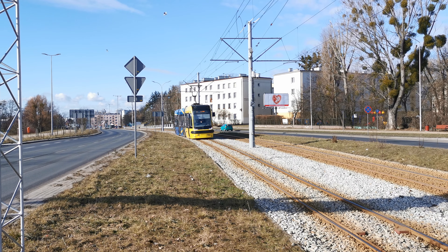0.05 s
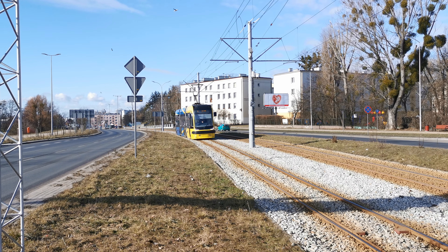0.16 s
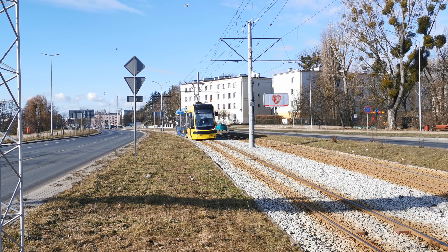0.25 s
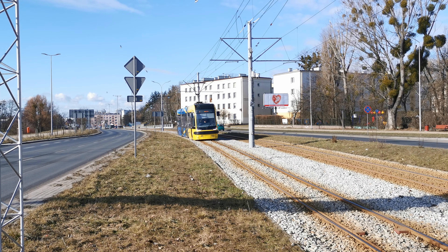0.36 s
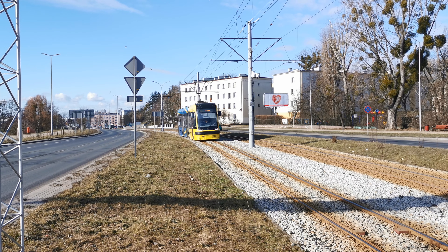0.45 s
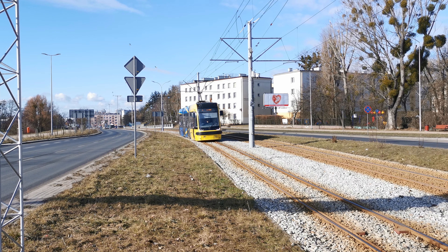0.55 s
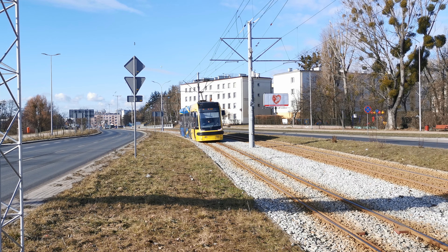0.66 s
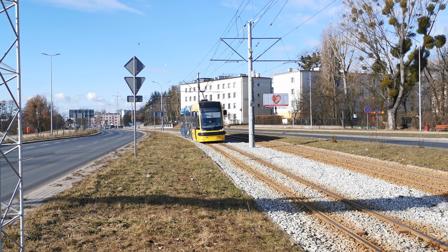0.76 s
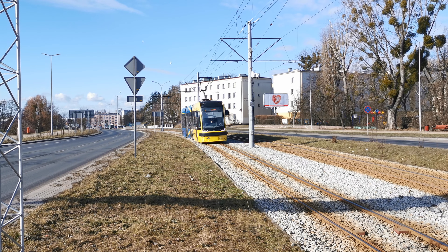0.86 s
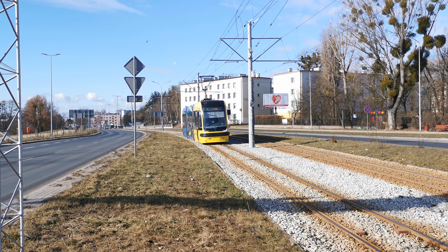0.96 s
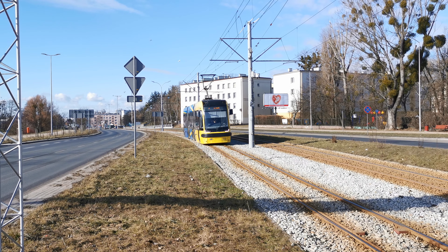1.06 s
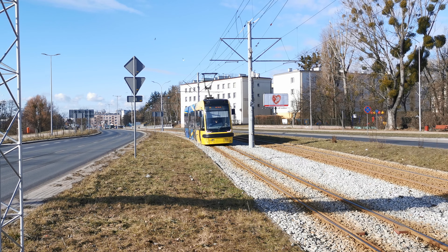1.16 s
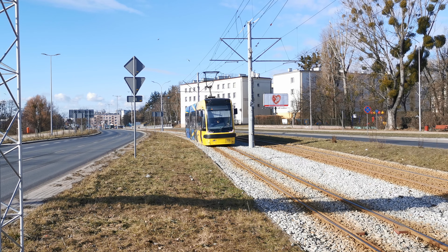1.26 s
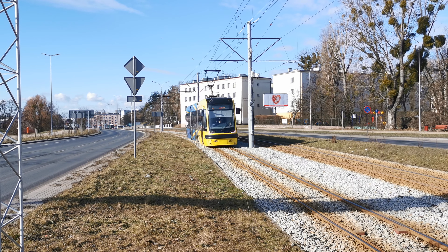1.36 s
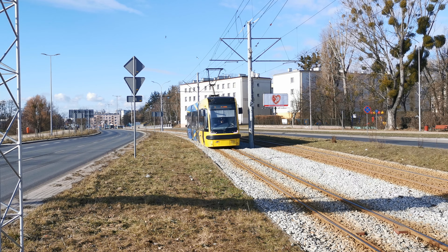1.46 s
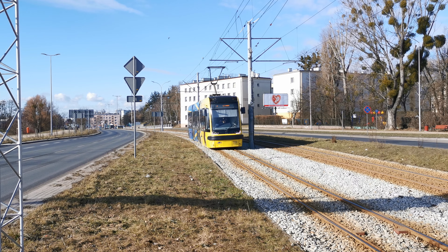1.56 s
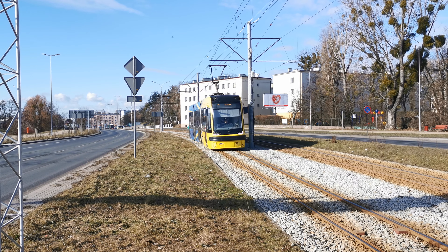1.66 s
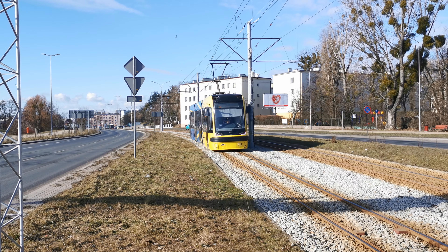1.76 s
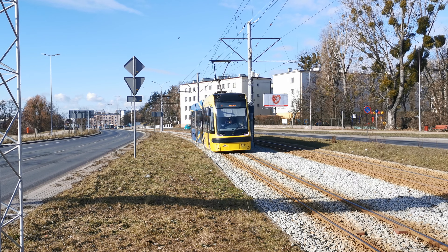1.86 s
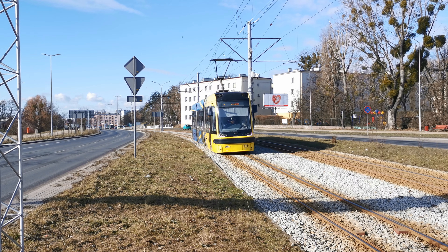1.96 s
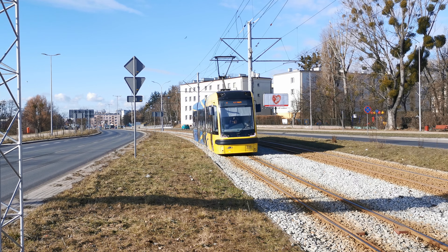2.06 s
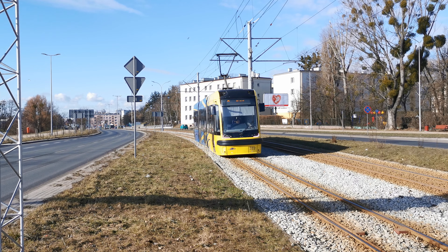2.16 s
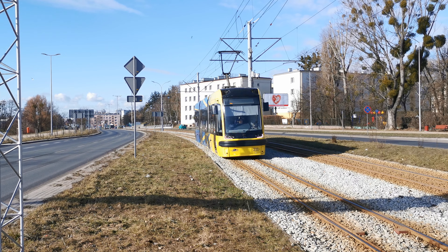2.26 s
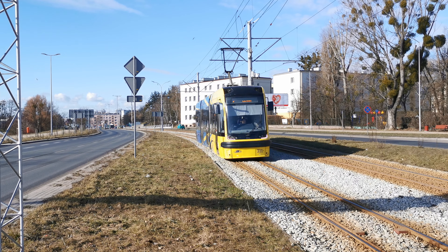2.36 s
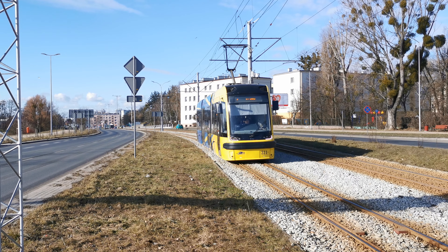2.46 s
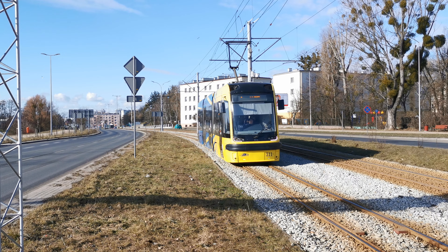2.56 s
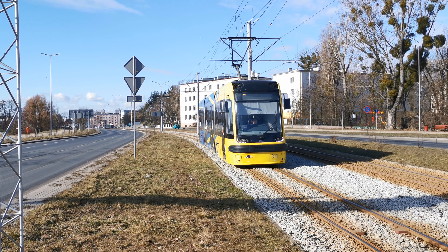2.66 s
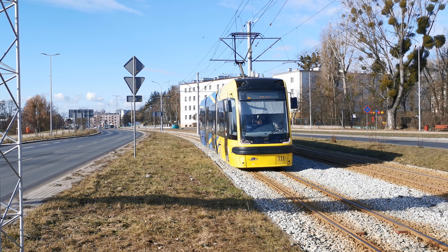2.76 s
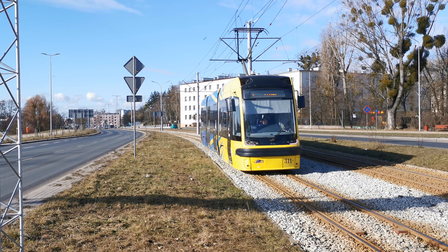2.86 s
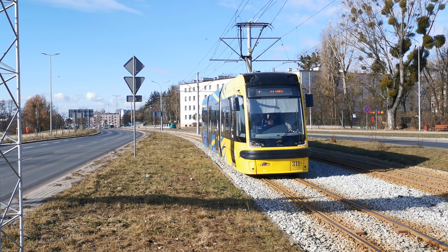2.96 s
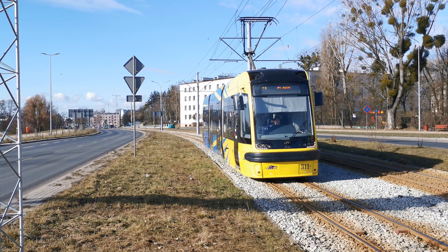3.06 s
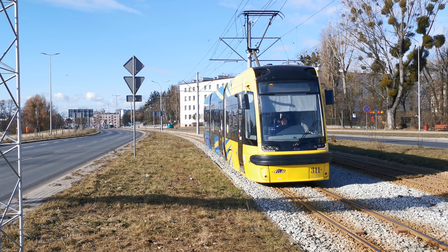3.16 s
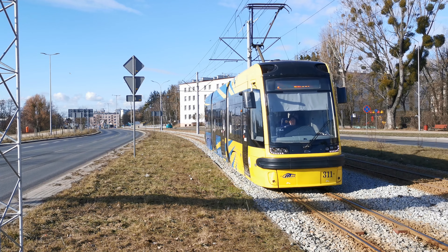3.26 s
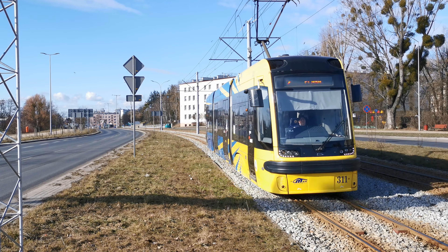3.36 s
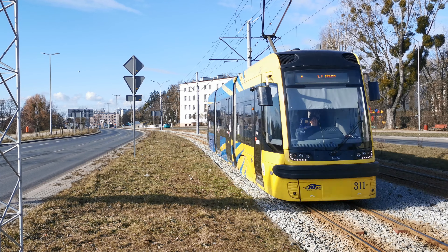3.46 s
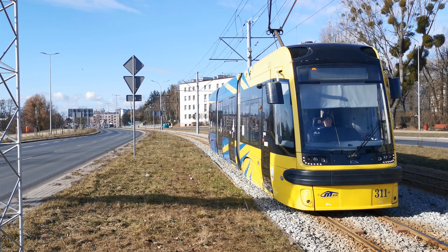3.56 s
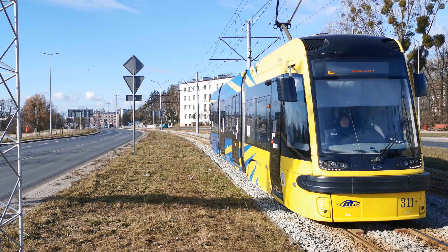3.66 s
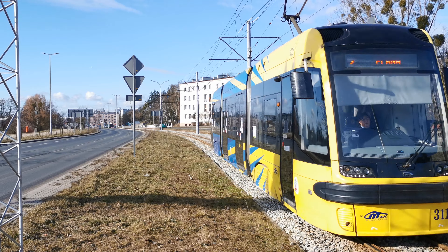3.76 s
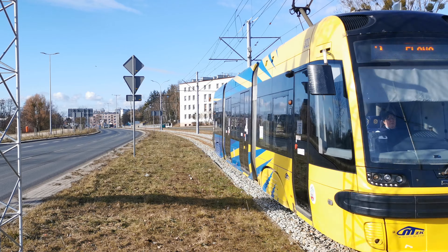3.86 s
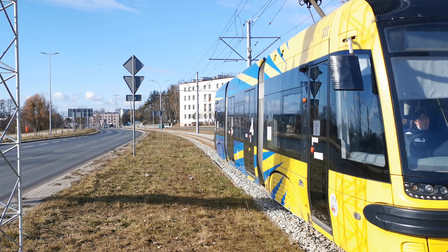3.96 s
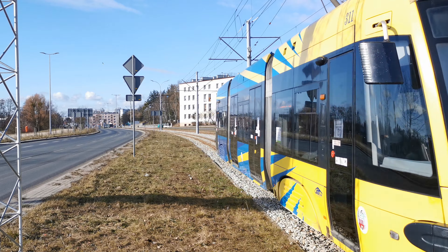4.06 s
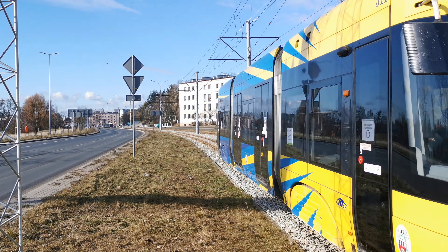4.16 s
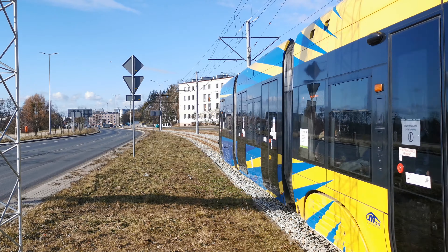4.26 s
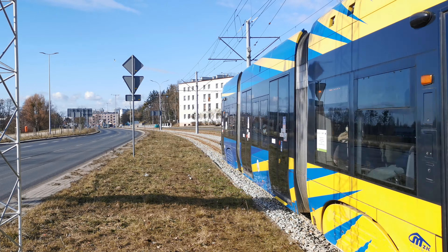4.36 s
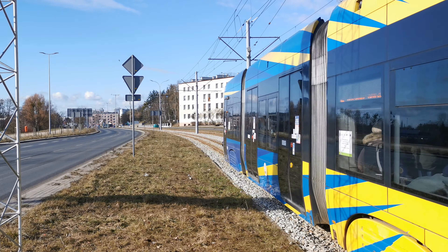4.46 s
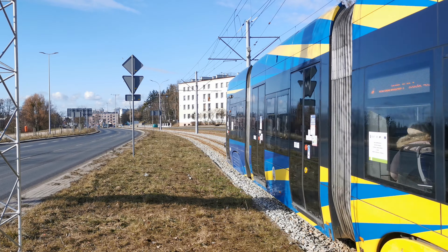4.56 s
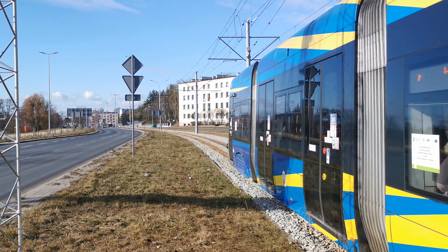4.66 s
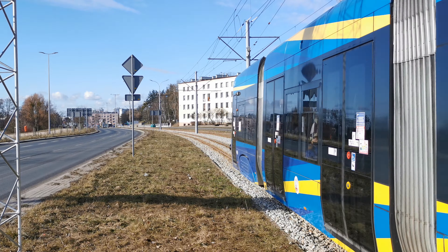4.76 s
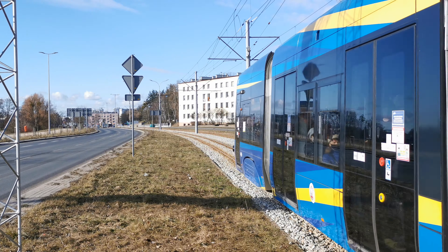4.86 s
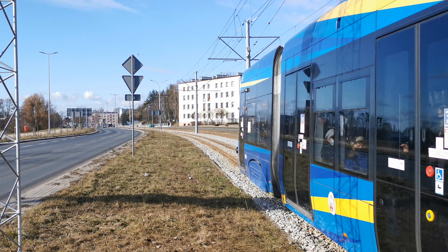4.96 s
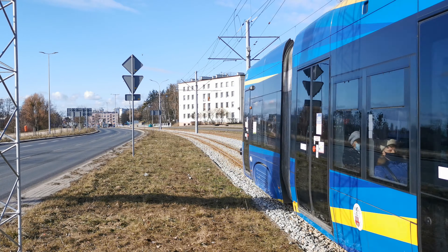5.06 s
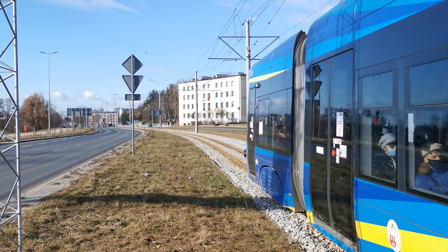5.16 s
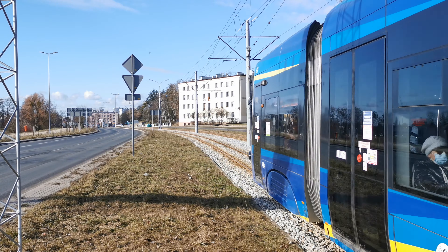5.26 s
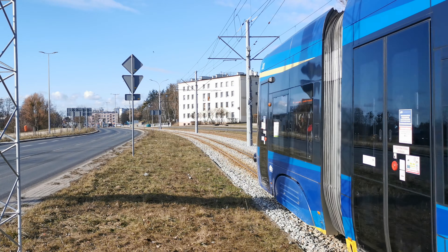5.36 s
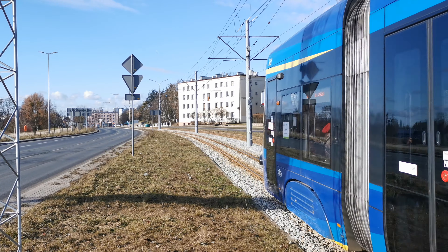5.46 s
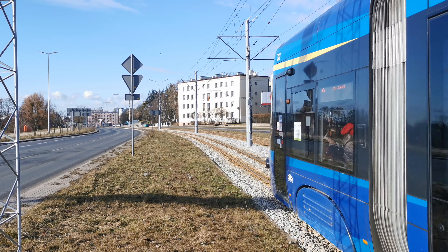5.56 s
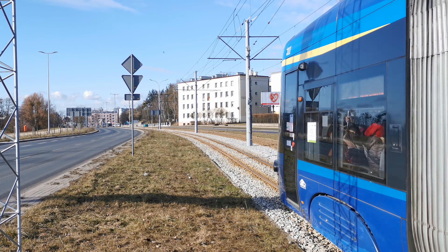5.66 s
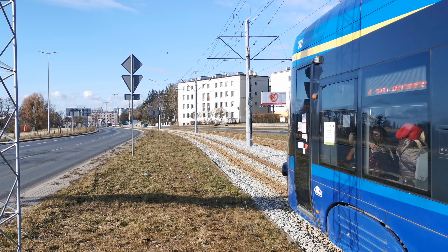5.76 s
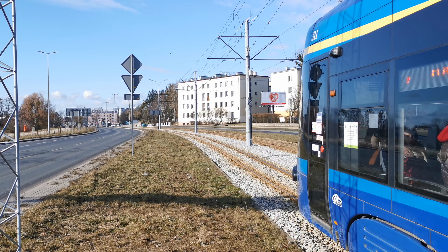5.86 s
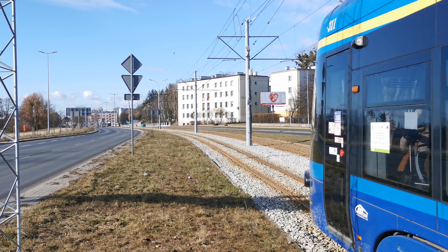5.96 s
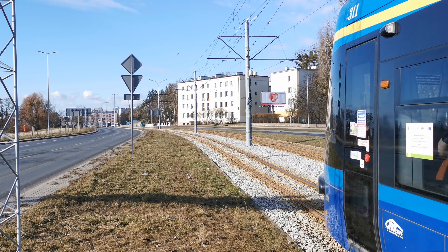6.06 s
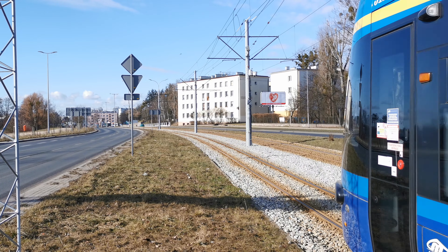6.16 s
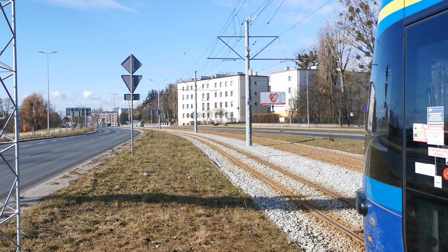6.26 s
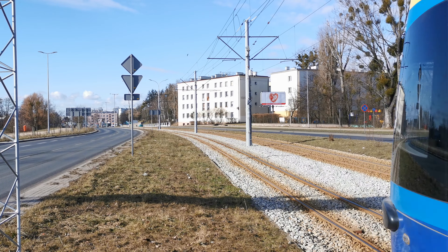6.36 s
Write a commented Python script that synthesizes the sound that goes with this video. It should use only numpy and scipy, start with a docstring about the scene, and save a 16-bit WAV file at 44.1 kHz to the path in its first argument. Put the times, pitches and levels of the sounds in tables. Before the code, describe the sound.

An electric tram approaches and passes close by, its wheels roaring and thumping on the rails over a slowly falling hum.

```python
"""A grass verge beside ballasted tram track, a stereo microphone a few metres from the rails.
Far traffic drones behind a thin, fitful rustle; then a low-floor tram slows past, close by.
Its wheels roar on rough rail and ring, the gear hum sinks with the speed, and the roof converter's
whine drops as it goes by. The running gear thumps, the panels boom and the ground shakes."""
import sys
import numpy as np
from scipy import signal
from scipy.fft import rfft, irfft, next_fast_len
from scipy.io import wavfile
from scipy.ndimage import uniform_filter1d, map_coordinates

SR = 44100
rng = np.random.default_rng(int(sys.argv[2]) if len(sys.argv) > 2 else 0)


def transcribe(signal):
    """Save signal, clipped to [-1, 1], as a 16-bit WAV file at the path in sys.argv[1]."""
    frames = np.atleast_2d(signal).T
    limited = np.clip(frames, -1, 1)
    pcm = np.round(limited * 32767).astype(np.int16)
    wavfile.write(sys.argv[1], SR, pcm)


N = 283284
TIME = np.arange(N) / SR
NOSE_S = 4.127  # the tram's nose is abreast of the microphone
FRONT_M, REAR_M = 4.56, 15.18  # the bogies, behind the nose


def amp(db):
    """Decibels to gain."""
    return 10 ** (np.asarray(db) / 20)


def unit(x):
    """Scale to rms 1."""
    return x / np.sqrt(np.mean(x ** 2) + 1e-20)


def along(points, hz):
    """(Hz, value) points read on a log axis."""
    freqs, values = np.transpose(points)
    return np.interp(np.log(hz + 1), np.log(freqs + 1), values)


def curve(points):
    """(seconds, value) points read at every sample."""
    return np.interp(TIME, *np.transpose(points))


def wobble(rate):
    """A smooth random curve, rate knots a second."""
    return map_coordinates(rng.standard_normal(int(N * rate / SR) + 4), [TIME * rate])


def swells(rows, skew=1):
    """Sum of smooth humps (centre s, length s, height); with skew above 1 they rise faster than fall."""
    hump = lambda u: np.exp(-np.abs(u * np.where(u < 0, skew, 1 / skew)) ** 2.7)
    return sum(height * hump(2 * (TIME - s) / length) for s, length, height in rows)


def filtered(x, response):
    """x through a frequency response."""
    size = next_fast_len(N + 8192)
    return irfft(rfft(x, size) * response(np.fft.rfftfreq(size, 1 / SR)), size)[..., :N]


def colour(x, spectrum):
    """x through a spectrum that falls away steeply beyond its ends, at rms 1."""
    low, high = spectrum[0][0], spectrum[-1][0]
    band = lambda hz: (1 - 1 / (1 + (hz / low) ** 8)) / (1 + (hz / high) ** 8)
    return unit(filtered(x, lambda hz: amp(along(spectrum, hz)) * band(hz)))


def noise(patchy_db):
    """Three unrelated noises sharing patches of gain: now one band stands out, now another."""
    spectra = signal.stft(rng.standard_normal((3, N)), nperseg=1024)[2]
    patches = uniform_filter1d(rng.standard_normal(spectra.shape[1:]), size=5, axis=0)
    patches = unit(uniform_filter1d(patches, size=7, axis=1))
    return unit(signal.istft(spectra * amp(patchy_db * patches), nperseg=1024)[1][:, :N])


def grit(per_s, life_s, size):
    """Excitation gain: small specks each give a brief jolt."""
    jolts = (rng.random(N) < per_s / SR) * rng.uniform(0.25, 1, N)
    return 1 + size * signal.lfilter([1], [1, -np.exp(-1 / (life_s * SR))], jolts)


# The gear mesh as the tram brakes. Each row: time in seconds, pitch in Hz.
MESH_PITCH = [(0, 347.5), (0.85, 345.6), (2.4, 322), (3.8, 295.1), (4.85, 266.5), (5.65, 241.5),
              (6.42, 222.4)]
def mesh_hz():
    """Gear teeth meeting per second."""
    return curve(MESH_PITCH)


def speed(m_per_tooth=0.029):
    """The tram's speed in m/s."""
    return m_per_tooth * mesh_hz()


def past(behind_m):
    """Metres by which a point so far behind the nose has passed the microphone."""
    travel = np.cumsum(speed()) / SR
    return travel - np.interp(NOSE_S, TIME, travel) - behind_m


def nearness(behind_m, reach_m):
    """Closest distance over present distance of a point on the tram: 1 when abreast."""
    return reach_m / np.hypot(past(behind_m), reach_m)


def bogies(front_db, rear_db, lag_m, reach_m, fall=1):
    """Gain of a sound that both bogies make, loudest lag_m after each goes by."""
    return np.hypot(amp(front_db) * nearness(FRONT_M + lag_m, reach_m) ** fall,
                    amp(rear_db) * nearness(REAR_M + lag_m, reach_m) ** fall)


def unveiled(at_m, over_m):
    """The nose screens a source until the tram's side comes into view: 0 to 1."""
    return 0.5 + 0.5 * np.tanh(past(at_m) / over_m)


def ahead(db, fall):
    """Gain of what the track carries ahead of the tram; it fades slowly with distance."""
    return amp(db) * nearness(FRONT_M, reach_m=6.65) ** fall


# Scattered sound at the microphone's two ports. Each row: frequency in Hz, likeness from 0 to 1.
PORT_LIKENESS = [(30, 0.95), (150, 0.98), (300, 0.95), (550, 0.76), (900, 0.66), (1500, 0.25), (15000, 0)]
def scattered(pair):
    """Sound from all around: alike at both ports in the bass, unrelated in the treble."""
    angle = lambda hz: np.arccos(np.clip(along(PORT_LIKENESS, hz), -1, 1)) / 2
    mid, side = filtered(pair, lambda hz: np.array([np.cos(angle(hz)), np.sin(angle(hz))]))
    return np.array([mid + side, mid - side])


def diffuse(spectrum, patchy_db):
    """Coloured noise with no direction."""
    return colour(scattered(noise(patchy_db)[1:]), spectrum)


def aimed(x, port_lag_ms=0.25):
    """Sound from the tram's direction reaches one port first; the order turns as the front goes by."""
    bearing = past(behind_m=1.93) / np.hypot(past(behind_m=3), 3)
    half_lag = port_lag_ms * bearing * SR / 2000
    return np.array([map_coordinates(x, [np.arange(N) + way * half_lag], mode="nearest")
                     for way in (-1, 1)])


def radiated(spectrum, patchy_db, drive=1, direct=1):
    """Noise from the tram's direction: a straight path plus scatter from the surroundings."""
    share = 0.44 * direct  # of the power, on the straight path
    source = noise(patchy_db) * drive
    pair = np.sqrt(share) * aimed(source[0]) + np.sqrt(1 - share) * scattered(source[1:])
    return colour(pair, spectrum)


def bursts(rows, spectrum, t60, attack_s=0.001):
    """Short contacts, each a quickly dying puff of noise."""
    attack = lambda s: np.clip((TIME - s) / attack_s, 0, 1)
    level = sum(attack(s) * amp(db - 60 * np.abs(TIME - s) / t60) for s, db in rows)
    return level * radiated(spectrum, patchy_db=1)


def ring(modes, loudest_s, swell_s):
    """Narrow resonances, rubbed into ringing, that swell and fade."""
    ringing = np.zeros(N)
    for hz, width, db in modes:
        waver = wobble(width) + 1j * wobble(width)
        ringing += amp(db) * unit((waver * np.exp(2j * np.pi * hz * TIME)).real)
    return aimed(ringing * np.exp(-((TIME - loudest_s) / swell_s) ** 2))


# The far drone's colour. Each row: frequency in Hz, relative level in dB.
DRONE_SPECTRUM = [(15, -38), (25, -7.5), (38, -1.5), (54, 5.5), (86, -2.5), (102, -15.5), (125, -12),
                  (160, -46), (280, -120)]
# Its swells and dips. Each row: centre in seconds, length in seconds, change in dB.
DRONE_SWELLS = [(.14, 0.27, -8), (1.07, 0.074, 5.5), (1.4, 0.086, 8), (2.22, 0.24, 2), (2.68, 0.11, 8.5),
                (2.85, .2, -7), (3.7, 0.51, 2)]
def distant_drone():
    """A deep drone from far off that wavers, swells and dips."""
    level_db = -45.5 + swells(DRONE_SWELLS) + 1.2 * wobble(5.82)
    return amp(level_db) * diffuse(DRONE_SPECTRUM, patchy_db=1)


# Street hiss and distant tyres. Each row: frequency in Hz, relative level in dB.
STREET_SPECTRUM = [(1710, -40), (2900, -6), (3450, -2.5), (3950, -3.5), (4290, -2.5), (4870, -5.5),
                   (5970, -10), (6960, -11), (7360, -16.5), (8590, -11), (10000, -19.5), (15500, -21.5)]
TYRE_SPECTRUM = [(90, -7), (200, 1.5), (400, -11), (600, -6.5), (1000, -13), (1500, -12), (2100, -14)]
def far_traffic(fade_db_per_s=6):
    """The street hisses faintly while the tyres of a car fade far up the road."""
    street = amp(-69) * diffuse(STREET_SPECTRUM, patchy_db=3)
    car = amp(-57.5 - fade_db_per_s * TIME) * diffuse(TYRE_SPECTRUM, patchy_db=2)
    return street + car


# Fits of rustle. Each row: centre in seconds, length in seconds, fizz in dB, scratch in dB.
RUSTLE_FITS = [(0.052, 0.13, -62, -61.5), (.25, .04, -69, -80), (0.428, .05, -65, -70),
               (0.574, 0.056, -62, -70), (0.668, 0.14, -63, -62.5), (0.789, 0.068, -58.5, -60),
               (0.873, 0.086, -60.5, -62), (1.054, 0.078, -61, -62), (1.237, 0.072, -61.5, -61),
               (1.349, 0.28, -73, -82), (1.538, 0.042, -66, -65.5), (1.737, 0.062, -64, -65),
               (1.865, 0.048, -64.5, -86), (2.214, 0.11, -69, -92), (2.38, 0.13, -69, -96),
               (2.544, 0.084, -67.5, -82), (2.784, 0.64, -75, -72), (3.28, 0.18, -75, -75)]
# The rustle's two colours. Each row: frequency in Hz, relative level in dB.
SCRATCH_SPECTRUM = [(3700, -8), (4100, -4), (4600, 0), (5200, -9), (6000, -7), (6700, -5), (7800, -10),
                    (8900, -6), (9700, -13)]
FIZZ_SPECTRUM = [(6120, -37), (10400, -12), (10900, -3), (12800, 3), (14600, 1), (15500, 2.5)]
def rustle(lag_s=0.04):
    """A thin, grainy rustle in fits: each a fizz, then a lower, longer scratch."""
    fibres = grit(per_s=420, life_s=0.00078, size=1.2) * amp(1.6 * wobble(45))
    fizz = swells([(s, length, amp(db)) for s, length, db, _ in RUSTLE_FITS], skew=1.22)
    scratch = swells([(s + lag_s, 1.53 * length, amp(db)) for s, length, _, db in RUSTLE_FITS], skew=1.06)
    return (scratch * radiated(SCRATCH_SPECTRUM, patchy_db=2.5, drive=fibres)
            + fizz * radiated(FIZZ_SPECTRUM, patchy_db=2.8, drive=fibres, direct=0.3))


# Squeaks within the rustle. Each row: centre in seconds, pitch in Hz, level in dB.
SQUEAKS = [(.19, 4280, -62.5), (.945, 4180, -61.5), (1.115, 4600, -57.5), (1.86, 14600, -52)]
def squeaks(width_hz=600):
    """Tiny squeaks, each one briefly rubbed resonance."""
    return sum(ring([(hz, width_hz, db)], loudest_s=s, swell_s=0.021) for s, hz, db in SQUEAKS)


# Ticks heard from the verge. Each row: start in seconds, relative level in dB.
TICKS = [(1.995, -57), (2.038, -53), (2.765, -53), (2.802, -49.5)]
# Their colour. Each row: frequency in Hz, relative level in dB.
TICK_SPECTRUM = [(1500, -18), (3300, 8.5), (4400, -8), (5600, 4), (8000, -15), (15000, -26)]
def ticks():
    """Faint dry contacts before the tram arrives."""
    return amp(-5.5) * bursts(TICKS, TICK_SPECTRUM, t60=0.2)


# The track beside the microphone. Each row: resonance in Hz, width in Hz, level in dB.
TRACK_MODES = [(540, 23, -50), (624, 18, -49)]
def track_ring():
    """The track rings briefly as the nose comes by."""
    return ring(TRACK_MODES, loudest_s=4.2, swell_s=0.11)


# The ground at the verge. Each row: frequency in Hz, relative level in dB.
GROUND_SPECTRUM = [(25, -9), (37, 3), (55, -4), (85, 1.5), (120, 3)]
def ground_shake():
    """The ground shakes under each bogie."""
    level = bogies(front_db=-38, rear_db=-30, lag_m=-1.66, reach_m=1.6, fall=1.22)
    return level * diffuse(GROUND_SPECTRUM, patchy_db=1.5)


# Body panels from afar and close up. Each row: frequency in Hz, relative level in dB.
FAR_PANEL_SPECTRUM = [(80, -3), (130, -2), (175, -3), (220, -17)]
PANEL_SPECTRUM = [(60, -10), (100, -6.5), (150, 0), (200, -2), (260, -2.5), (330, -4), (400, -12),
                  (520, -46)]
def panel_boom():
    """The tram's panels boom, darker from afar than close by."""
    far = ahead(db=-49, fall=1.65) * radiated(FAR_PANEL_SPECTRUM, patchy_db=0)
    close = unveiled(at_m=0.6, over_m=0.7) * bogies(front_db=-33, rear_db=-34, lag_m=-1.5, reach_m=7.7)
    return far + (ahead(db=-43, fall=0.88) + close) * radiated(PANEL_SPECTRUM, patchy_db=2)


def converter_whine(whine_hz=4016, behind_m=7.6, distance_m=2.5, sound_m_per_s=343):
    """The roof unit's switching tone and sideband: Doppler-bent, fluttering as reflections interfere."""
    receding = speed() * nearness(behind_m, distance_m) * past(behind_m) / distance_m
    phase = 2 * np.pi * np.cumsum(whine_hz * (1 - receding / sound_m_per_s)) / SR
    tone = lambda ratio: amp(1.6 * wobble(14)) * np.sin(ratio * phase + 0.45 * wobble(22))
    pair = np.array([tone(1) + amp(-7) * tone(0.968) for port in range(2)])
    beam = nearness(behind_m=6.9, reach_m=2) ** 1.7  # loudest just before the unit is abreast
    return amp(-42) * unveiled(at_m=1, over_m=4) * beam * pair


# Knocks at close range. Each row: start in seconds, level in dB.
KNOCKS = [(5.772, -21), (5.971, -26), (5.995, -26)]
# Their colour. Each row: frequency in Hz, relative level in dB.
KNOCK_SPECTRUM = [(300, -25), (700, -8), (1150, 0), (1600, -6), (2500, -3), (4000, -15), (8000, -42),
                  (15000, -55)]
def bogie_knocks():
    """The rear bogie knocks sharply as it passes."""
    return bursts(KNOCKS, KNOCK_SPECTRUM, t60=0.06)


# Dull blows close by. Each row: start in seconds, level in dB, pitch in Hz, length in seconds.
THUMPS = [(3.932, -26, 128.6, 0.061), (4.278, -20.5, 142.4, 0.045), (4.298, -23.5, 196.5, 0.048),
          (4.503, -20.5, 161, 0.046), (4.83, -25.5, 80, 0.025), (5.232, -21, 119, 0.052),
          (5.612, -15, 153.6, 0.045), (5.874, -14.5, 148, 0.021), (5.96, -19, 157.6, 0.036),
          (6.225, -24.5, 91.2, 0.046)]
def thumps():
    """The running gear booms for a few cycles at each blow and shakes the panels with it."""
    booms, shaking = np.zeros(N), np.zeros(N)
    for s, db, hz, length in THUMPS:
        swell = amp(db) * np.sin(np.pi * np.clip((TIME - s) / length, 0, 1))
        booms += swell * np.sin(2 * np.pi * hz * (TIME - s))
        shaking += swell
    return aimed(booms) + amp(-10) * shaking * radiated(PANEL_SPECTRUM, patchy_db=1)


# The hum's swells and dips. Each row: centre in seconds, length in seconds, change in dB.
HUM_SWELLS = [(1.9, 0.11, 6), (2.43, 0.14, 10.5), (2.82, 0.24, 9), (3.05, 0.79, -3.5), (3.5, .14, 4.5),
              (4.4, 0.17, -8), (5.23, 0.097, 8.5), (5.42, 0.16, 1.5), (6.03, 0.064, 4)]
def gear_hum():
    """The mesh tone, and its octave near each bogie; uneven tooth load smears a skirt around both."""
    tone = np.exp(2j * np.pi * np.cumsum(mesh_hz()) / SR)
    smear = lambda rate: 1 + 0.44 * (wobble(rate) + 1j * wobble(rate))
    mesh = bogies(front_db=-25, rear_db=-26.5, lag_m=0.4, reach_m=1.975, fall=1.572)
    octave = bogies(front_db=-38, rear_db=-30.5, lag_m=2.7, reach_m=2.5, fall=2.5)
    octave *= unveiled(at_m=2.3, over_m=2.5)
    hum = mesh * smear(rate=48) * tone + octave * smear(rate=54) * tone ** 2
    return aimed(np.sqrt(2) * amp(swells(HUM_SWELLS)) * hum.real)


# Front and rear wheels, close by. Each row: resonance in Hz, width in Hz, level in dB.
FRONT_WHEEL_MODES = [(1036, 35, -49), (1340, 34, -44), (1518, 83, -33.5), (1652, 130, -34), (2060, 69, -43),
                     (2640, 150, -41), (3380, 200, -49.5)]
REAR_WHEEL_MODES = [(1040, 35, -39), (1170, 40, -46), (1400, 130, -39), (1560, 70, -46), (2546, 45, -39.5),
                    (2700, 100, -42), (3541, 14, -49), (3560, 220, -46), (4727, 50, -54)]
def wheel_ring():
    """Each bogie's wheels ring out as it clears the tram's skirt."""
    return (ring(FRONT_WHEEL_MODES, loudest_s=4.94, swell_s=0.34)
            + ring(REAR_WHEEL_MODES, loudest_s=6.3, swell_s=0.29))


# The parts of the roar, heard from the verge. Each row: frequency in Hz, relative level in dB.
SLEEPER_SPECTRUM = [(200, -11.5), (340, 2), (507, -3), (566, -5.5), (633, -4.5), (850, -11.5), (1100, -9),
                    (1870, -120)]
FAR_RAIL_SPECTRUM = [(440, -25), (750, -8), (868, -1.5), (959, -8.5), (1150, 0), (1360, -4.5), (1480, -4.5),
                     (1660, -7), (1870, -2), (2100, -11.5), (2730, -28), (4620, -120)]
RAIL_SPECTRUM = [(750, 0.5), (900, -4), (1040, -1), (1200, -0.5), (1480, 1), (1700, -7), (1900, -3.5),
                 (2100, -6)]
WHEEL_SPECTRUM = [(1060, -47), (1800, -8), (2170, -5), (2610, -0.5), (3070, -15.5), (3300, -16.5),
                  (4290, -42), (7260, -120)]
SCRAPE_SPECTRUM = [(3000, 4), (3300, 1), (3750, 1), (3950, 4.5), (4100, -1), (4300, -4), (4800, -5),
                   (5500, -11), (6200, -12), (6800, -14.5), (7600, -20), (8200, -29)]
HISS_SPECTRUM = [(4240, -25), (7200, -16.5), (8050, -9.5), (9150, -3), (9940, -8.5), (10800, -1),
                 (11400, -3), (15500, -15.5)]
def rolling_roar():
    """Wheels on rough rail: sleepers, rails and wheels each sound in their own range and spread."""
    contact = grit(per_s=60, life_s=0.0048, size=0.4) * amp(0.25 * wobble(13))
    # gains close to the bogies
    sleepers = bogies(front_db=-27, rear_db=-31, lag_m=2.37, reach_m=2.56, fall=1.43)
    rails = bogies(front_db=-30, rear_db=-28, lag_m=-0.5, reach_m=2)
    wheels = bogies(front_db=-33.5, rear_db=-33, lag_m=0.3, reach_m=1.92, fall=1.1)
    scrape = bogies(front_db=-39, rear_db=-36.5, lag_m=2.7, reach_m=2.77)
    hiss = bogies(front_db=-51.5, rear_db=-53.5, lag_m=1.4, reach_m=1.66)
    # while the nose screens them, one hears what the track carries ahead
    sleepers = sleepers * unveiled(at_m=1.5, over_m=1.55) + ahead(db=-55, fall=0.51)
    rails = rails * unveiled(at_m=0.9, over_m=1.3)
    wheels = wheels * unveiled(at_m=2.7, over_m=1.55) + ahead(db=-57, fall=0.56)
    scrape = scrape * unveiled(at_m=3.2, over_m=2.2) + ahead(db=-56.5, fall=1.68)
    hiss = hiss * unveiled(at_m=3, over_m=3.2) + ahead(db=-76.5, fall=1.2)
    return (sleepers * radiated(SLEEPER_SPECTRUM, patchy_db=1.5)
            + ahead(db=-50, fall=1) * radiated(FAR_RAIL_SPECTRUM, patchy_db=1.7)
            + rails * radiated(RAIL_SPECTRUM, patchy_db=1.7, drive=contact, direct=0.88)
            + wheels * radiated(WHEEL_SPECTRUM, patchy_db=2, drive=contact, direct=0.82)
            + scrape * radiated(SCRAPE_SPECTRUM, patchy_db=2.5, drive=contact, direct=0.3)
            + hiss * radiated(HISS_SPECTRUM, patchy_db=-2.5, drive=contact, direct=0.15))


# The microphone housing's shadow. Each row: time in seconds, left minus right in dB.
HOUSING_SHADE = [(0, 1), (3.8, 1), (4, 2.5), (4.83, 0), (5.6, -6), (6, -.5)]
def scene():
    """The tram over the street; the housing shades one port from roar and ring, but not from the bass."""
    ringing = wheel_ring() + track_ring()
    rumble = distant_drone() + ground_shake() + panel_boom()
    shade = amp(np.array([[0.5], [-0.5]]) * curve(HOUSING_SHADE))
    tram = shade * (rolling_roar() + ringing) + gear_hum() + thumps() + converter_whine() + bogie_knocks()
    return rumble + tram + ticks() + squeaks() + far_traffic() + rustle()


def ports(x, balance):
    """Share each frequency's power between the two ports."""
    gains = lambda hz: amp(np.array([[0.5], [-0.5]]) * along(balance, hz))
    return filtered(x, lambda hz: gains(hz) / np.sqrt(np.mean(gains(hz) ** 2, axis=0)))


# The microphone's colour from ahead and from the side. Each row: frequency in Hz, left minus right in dB.
BALANCE_AHEAD = [(300, -.5), (1200, -2), (2250, -1.5), (2700, -13), (3150, 0.5), (4100, 0.5), (4800, -0.5),
                 (6000, -3), (7300, 2), (9000, 12), (11000, -0.5), (14000, 12)]
BALANCE_BESIDE = [(300, -0.5), (1300, 1.5), (2000, -2.5), (2550, 3.5), (2950, -8.5), (3550, 2.5),
                  (4500, 0.5), (5700, -6), (7200, 4), (8800, 7.5), (11000, 5.5), (14000, 9)]
def record(dry, right_low_cut_hz=3.7, top_hz=15700):
    """A band-limited stereo microphone on the verge; its colour turns as the nose arrives."""
    turn = np.interp(TIME, [3.8, 4.6], [0, np.pi / 2])
    left, right = np.cos(turn) * ports(dry, BALANCE_AHEAD) + np.sin(turn) * ports(dry, BALANCE_BESIDE)
    right = filtered(right, lambda hz: 1j * hz / (1j * hz + right_low_cut_hz))
    return filtered(np.array([left, right]), lambda hz: hz < top_hz)


dry = scene()
out = record(dry)
transcribe(out)
```